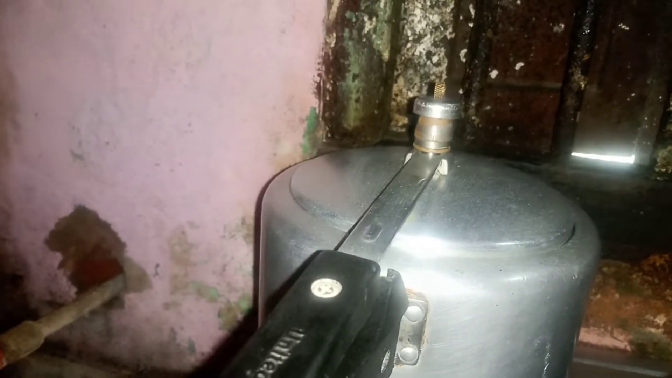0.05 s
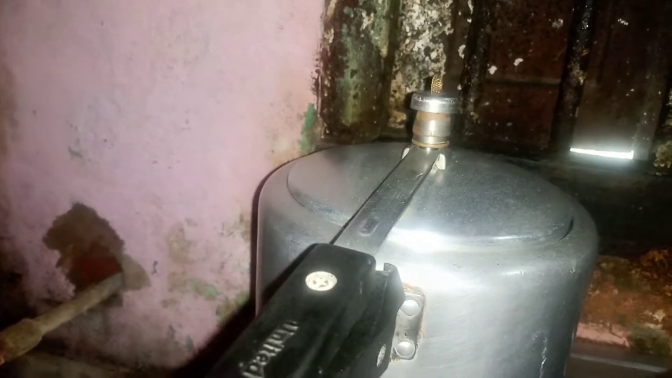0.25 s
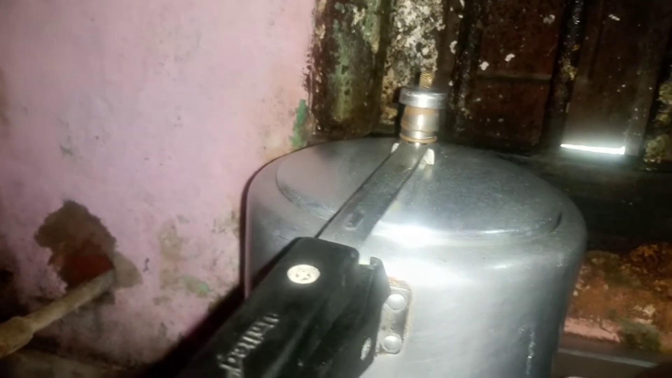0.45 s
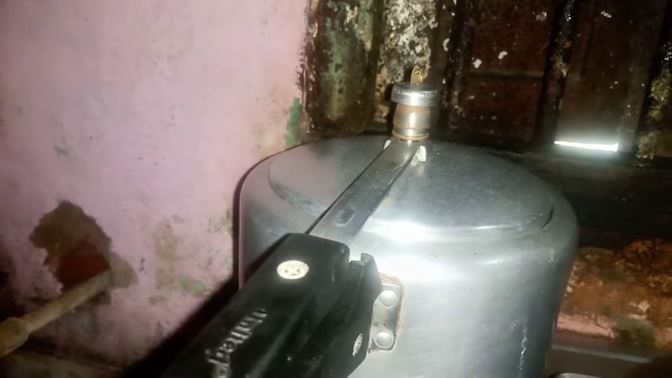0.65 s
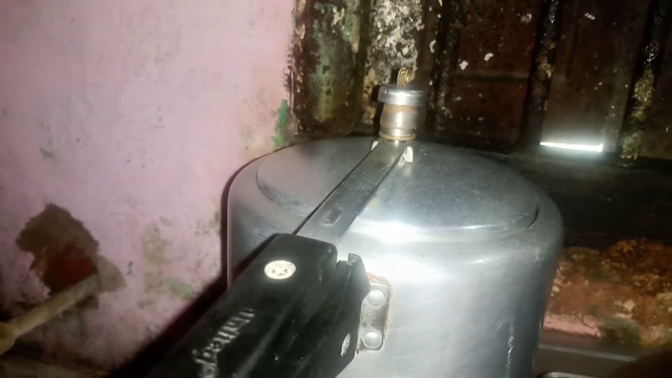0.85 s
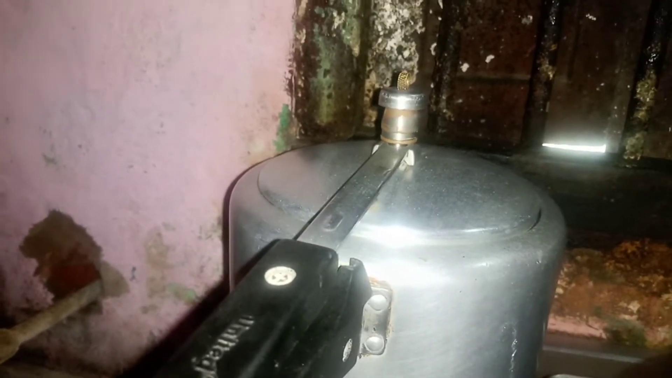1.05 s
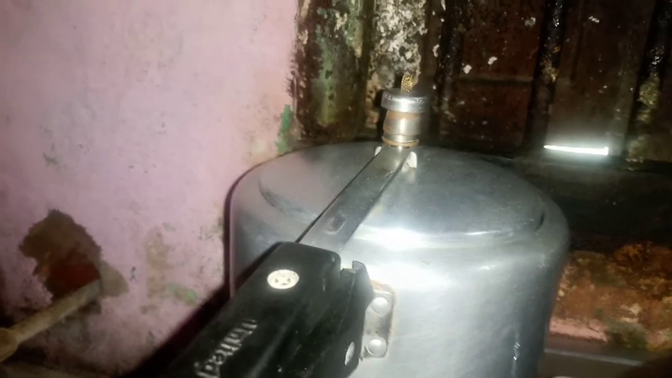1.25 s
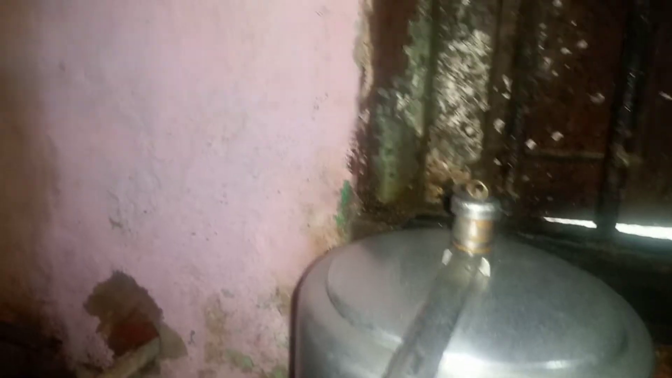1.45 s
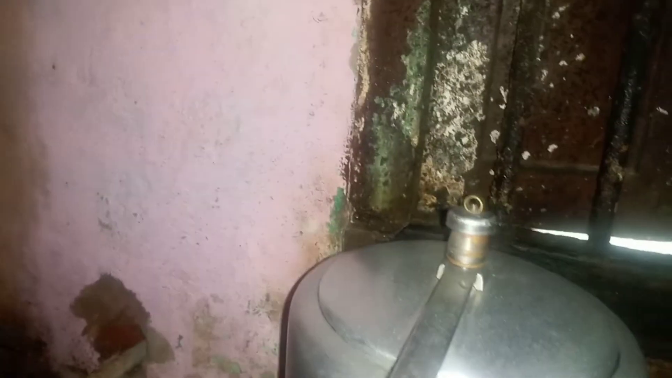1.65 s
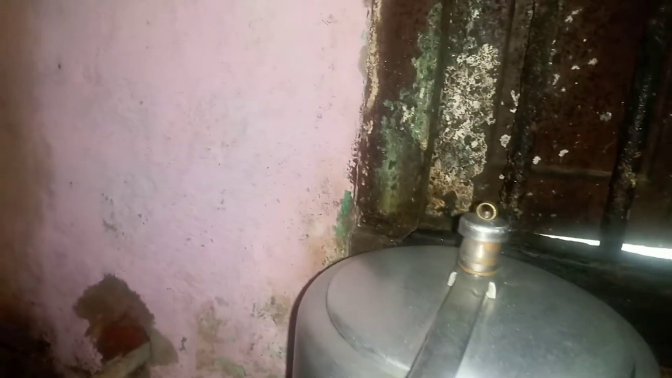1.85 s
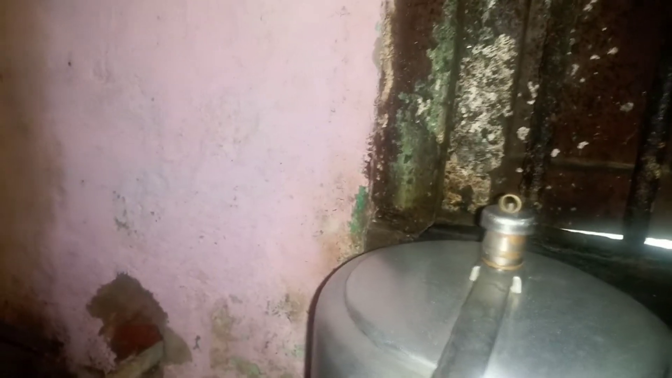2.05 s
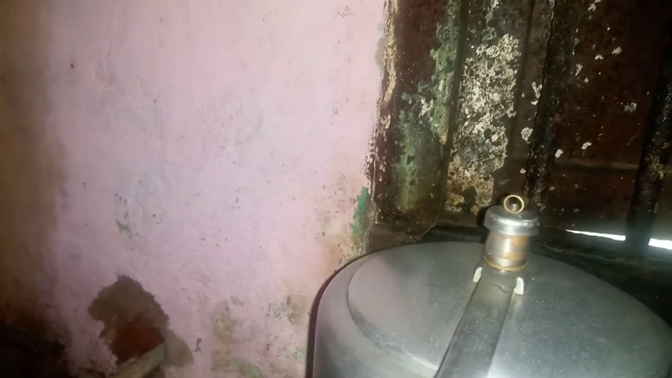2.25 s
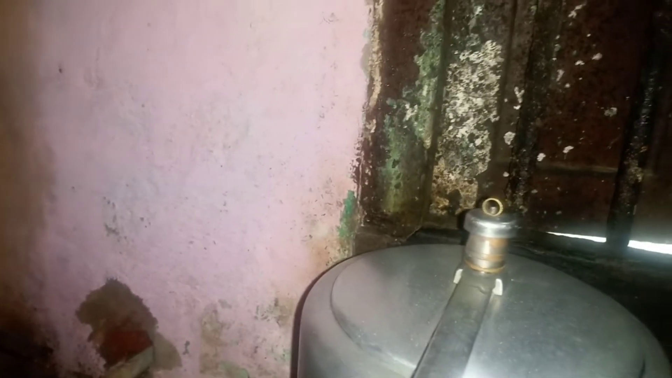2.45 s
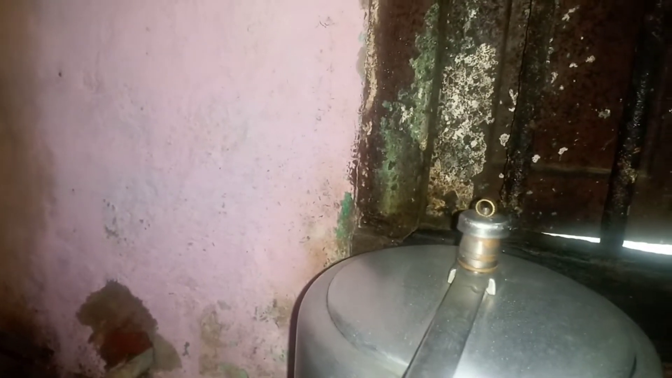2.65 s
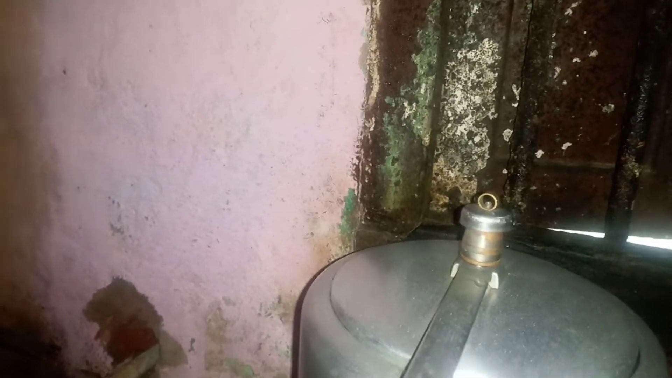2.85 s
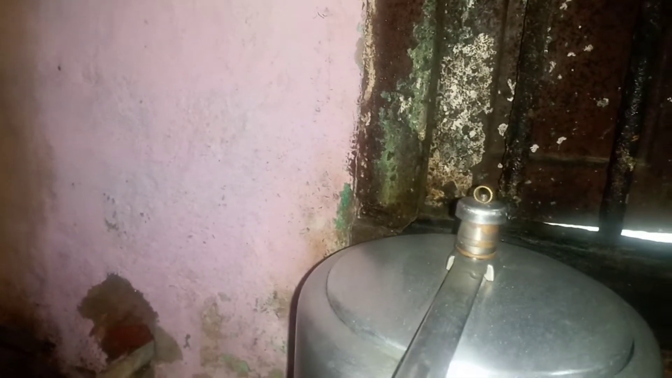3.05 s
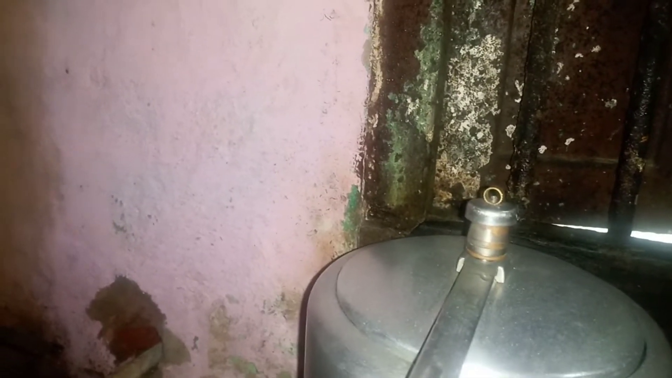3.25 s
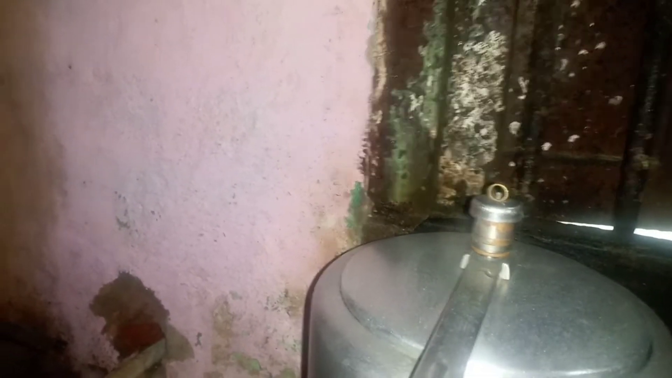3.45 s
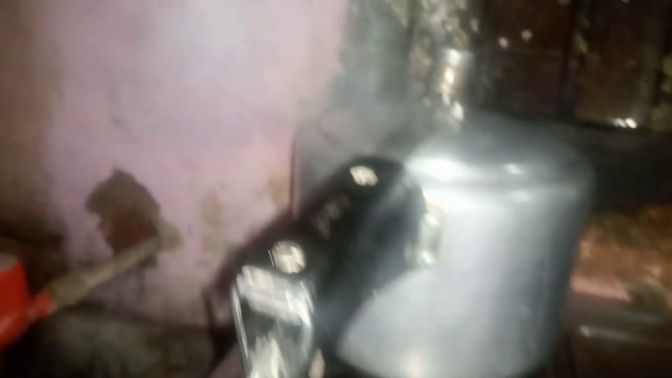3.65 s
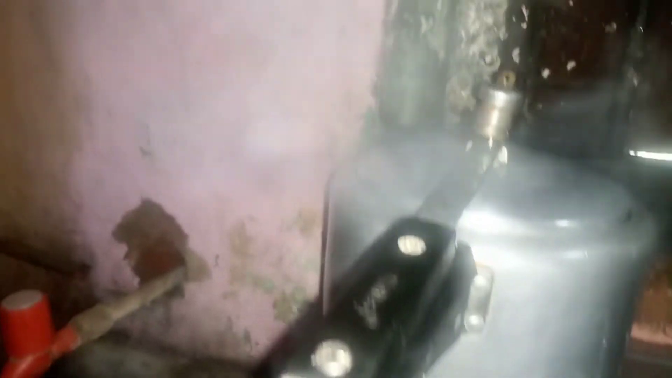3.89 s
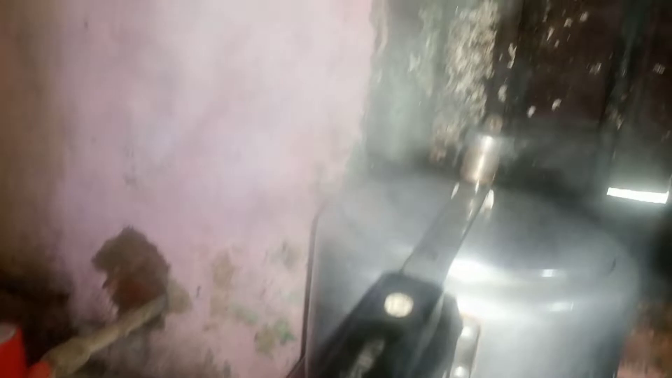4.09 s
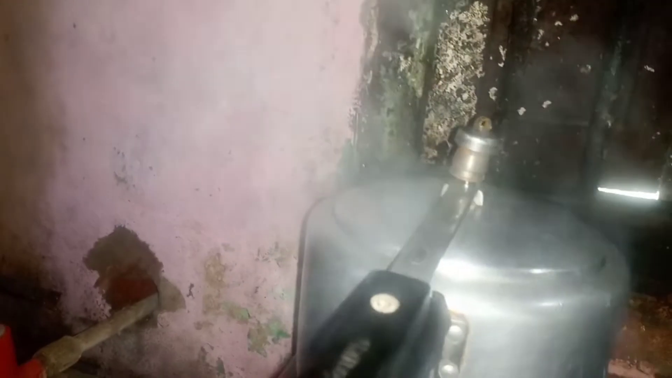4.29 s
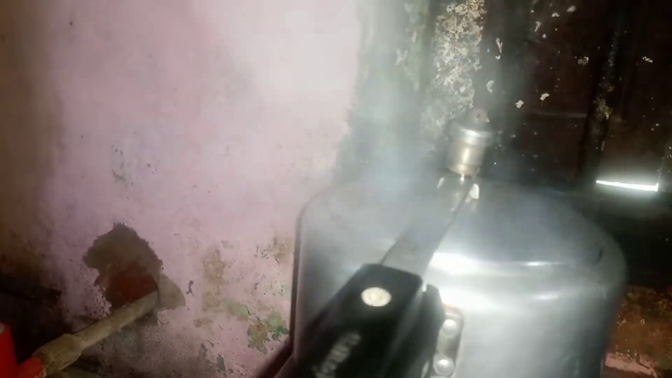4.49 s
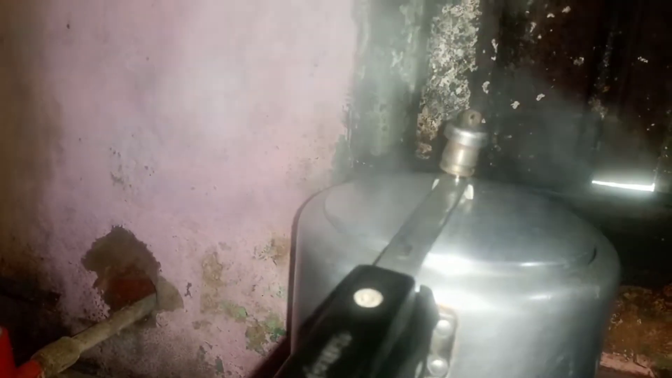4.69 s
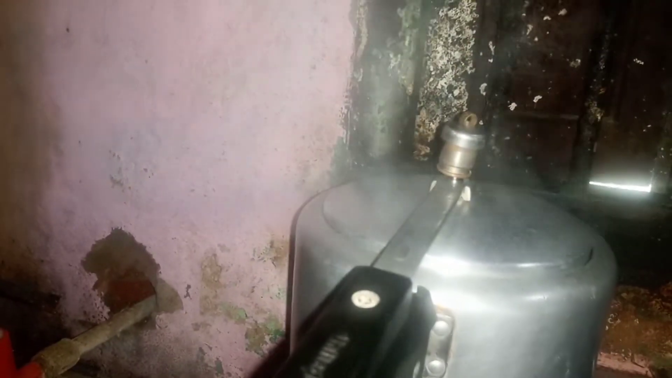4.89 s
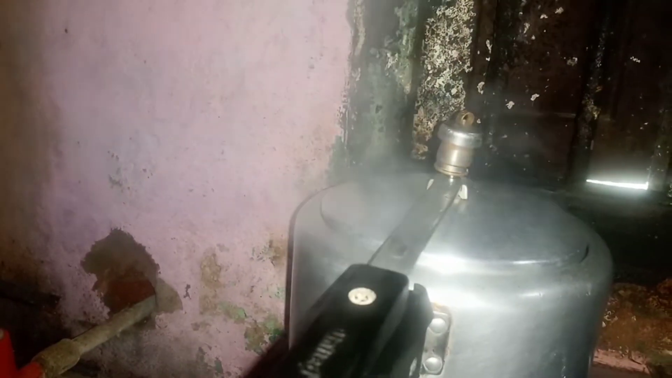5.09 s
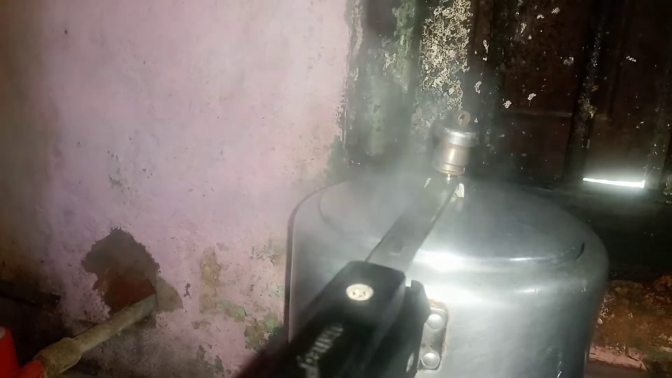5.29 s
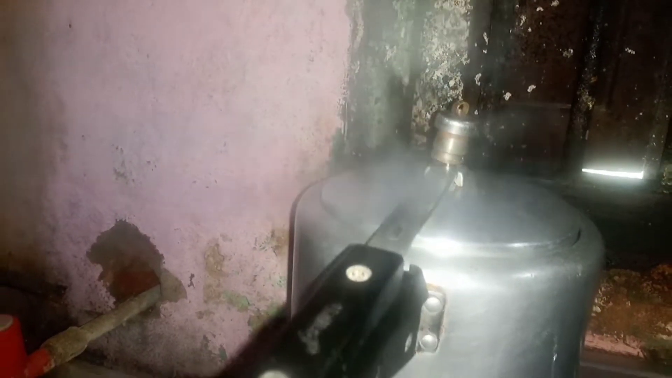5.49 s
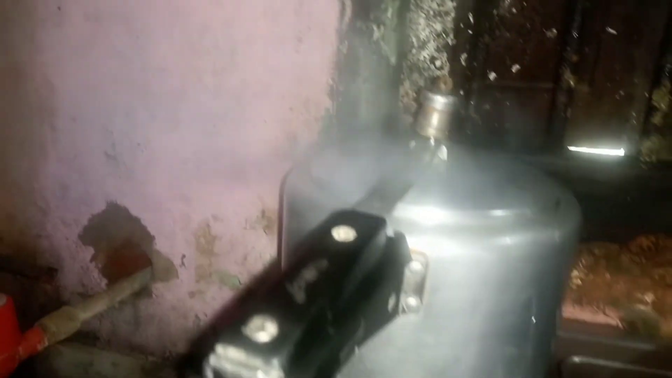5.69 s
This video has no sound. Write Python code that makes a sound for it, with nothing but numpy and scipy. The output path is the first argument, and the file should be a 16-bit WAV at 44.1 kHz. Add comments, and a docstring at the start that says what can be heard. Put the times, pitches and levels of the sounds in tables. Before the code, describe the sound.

A pressure cooker hisses in surges, thins to a seep, then vents a loud jet of steam that buffets the microphone.

```python
"""A small kitchen: a pressure cooker on a rumbling gas burner, heard by one near microphone.
Steam leaks under the weight valve, first in surges, then thinly, its colour sliding as the wet gap
changes. Then the weight lifts: the full jet roars and its eddies buffet the microphone.
Between these three stages the sound stops dead, then fades back in."""
import sys
import numpy as np
from scipy import signal
from scipy.fft import rfft, irfft, next_fast_len
from scipy.io import wavfile
from scipy.ndimage import uniform_filter1d, map_coordinates

SR = 44100
rng = np.random.default_rng(int(sys.argv[2]) if len(sys.argv) > 2 else 0)


def dump_mix(stems):
    """Bounce the given channels to the path in sys.argv[1] as a 16-bit WAV at rate SR."""
    frames = np.atleast_2d(stems).T  # one column per channel
    limited = np.clip(frames, -1, 1)  # hard clip at full scale
    pcm = np.round(limited * 32767).astype(np.int16)
    wavfile.write(sys.argv[1], SR, pcm)


N = 252693
T = np.arange(N) / SR


def amp(db):
    """Decibels to gain."""
    return 10 ** (np.asarray(db) / 20)


def unit(x):
    """Scaled to rms 1."""
    return x / np.sqrt(np.mean(x ** 2) + 1e-20)


def spectrum_gain(points, hz):
    """Gain through (Hz, dB) points on a log axis."""
    point_hz, db = np.transpose(points)
    return amp(np.interp(np.log(hz + 1), np.log(point_hz + 1), db))


def resonance_gain(modes, hz):
    """Gain of (centre Hz, width Hz, dB) resonances, summed in power."""
    return np.sqrt(sum(amp(db) ** 2 / (1 + (2 * (hz - f) / width) ** 2) for f, width, db in modes))


def swells(rows):
    """Gain of bell-shaped (centre s, half length s, dB) swells, summed in power."""
    return np.sqrt(sum(amp(db) ** 2 * np.exp(-2 * ((T - s) / half) ** 2) for s, half, db in rows))


def wobble(rate_hz):
    """Smooth random curve, rate_hz knots a second."""
    return map_coordinates(rng.standard_normal(int(N * rate_hz / SR) + 4), [T * rate_hz])


def filtered(x, response):
    """x through a gain given as a function of Hz."""
    size = next_fast_len(N + SR // 2)
    return irfft(rfft(x, size) * response(np.fft.rfftfreq(size, 1 / SR)), size)[:N]


def noise(response):
    """Coloured noise of rms 1."""
    return unit(filtered(rng.standard_normal(N), response))


# Flame spectrum. Each row: frequency in Hz, relative density in dB.
FLAME_SPECTRUM = [(25, -37), (55, -37), (75, -22), (100, -0.5), (125, -8), (185, -1), (230, -5), (285, -12),
                  (340, -7.5), (430, -17.5), (700, -4.5), (870, -11.5), (1200, -1), (2200, -9), (4000, -36)]
# Hollow under the pot. Each row: centre in Hz, width in Hz, relative level in dB.
HOLLOW_MODES = [(285.6, 29, 0)]
# Flame flares. Each row: centre in seconds, half length in seconds, level in dB.
FLAME_FLARES = [(.39, .12, -54), (3.28, 0.046, -56)]


def burner(boom_db=-64.5):
    """The gas flame rumbles and booms in the hollow under the pot, more so when it flares."""
    flame = amp(-55.5 + 1.8 * wobble(6.58)) * noise(lambda hz: spectrum_gain(FLAME_SPECTRUM, hz))
    boom_gain = np.hypot(amp(boom_db), swells(FLAME_FLARES))
    return flame + boom_gain * noise(lambda hz: resonance_gain(HOLLOW_MODES, hz) ** 2)


def eddies(starts_s, sizes, life_s, scatter):
    """Each eddy pushes or pulls on the microphone port and relaxes; the port band-limits the pulse."""
    t = np.arange(SR // 50) / SR
    draws = rng.standard_normal((len(starts_s), 2))
    lives_s = life_s * np.exp(scatter * draws[:, 1:])
    pulses = sizes[:, None] * np.sign(draws[:, :1]) * np.exp(-t / lives_s)
    samples = (starts_s[:, None] * SR).astype(int) + np.arange(len(t))
    pressure = np.bincount(samples.ravel(), pulses.ravel(), N)[:N]
    port = signal.butter(3, [106, 3950], 'band', fs=SR, output='sos')
    return signal.sosfilt(port, pressure)


LIFT_S = 3.456  # the weight lifts
# Plume turbulence. Each row: frequency in Hz, relative density in dB.
RUMBLE_SPECTRUM = [(25, -31), (45, -24), (70, -1), (110, 1), (200, -1.5), (400, -13), (1000, -22)]
# Gusts at the microphone. Each row: centre in seconds, relative buffet in dB, relative slap in dB.
PLUME_GUSTS = [(3.628, -54, -15), (3.729, -37, -10.5), (3.826, -35, -18), (3.939, -28.5, -16),
               (4.114, -27.5, -10.5), (4.18, -27.5, -20), (4.25, -31, -20), (4.311, -29, -10),
               (4.346, -34, -7.5), (4.444, -34.5, -10), (4.503, -22, -17), (4.68, -30.5, -15),
               (4.811, -25.5, -14), (4.872, -30.5, -12.5), (4.998, -34, -13), (5.103, -32.5, -13.5),
               (5.189, -34, -19), (5.313, -26, -13), (5.479, -42, -17), (5.659, -30, -14.5)]


def plume(eddy_count=2200, base_db=-34, build_s=0.29, gust_half_s=0.03):
    """Small eddies crackle at the microphone over a rumble; each gust swells both and lands a slap."""
    build = np.clip((T - LIFT_S) / build_s, 0, 1)
    gusts = swells([(s, gust_half_s, db) for s, db, _ in PLUME_GUSTS])
    buffet = np.hypot(amp(base_db) * build, gusts)
    starts_s = rng.uniform(0, T[-1], eddy_count)
    sizes = amp(6.5 * np.clip(rng.standard_normal(eddy_count), -2, 1.5))
    crackle = amp(-2) * buffet * unit(eddies(starts_s, sizes, life_s=0.0003, scatter=0.66))
    rumble_gain = buffet ** 0.72 * amp(-11 + 1.9 * wobble(45))  # steadier than the crackle
    rumble = rumble_gain * noise(lambda hz: spectrum_gain(RUMBLE_SPECTRUM, hz))
    gust_s, _, slap_db = np.transpose(PLUME_GUSTS)
    slaps = eddies(gust_s, amp(slap_db), life_s=0.00046, scatter=0.092)
    return crackle + rumble + slaps


def early_echoes(x, echo_db, spread_s=0.022, count=40):
    """Weak echoes off lid and walls ripple the spectrum."""
    lateness = rng.random(count)
    sizes = rng.standard_normal(count) * np.exp(-2 * lateness)
    delays_s = 0.001 + spread_s * lateness
    impulse = np.bincount((SR * delays_s).astype(int), sizes / np.linalg.norm(sizes))
    return unit(x + amp(echo_db) * signal.fftconvolve(x, impulse)[:N])


def jet(spectrum, modes, ring_db, echo_db):
    """Turbulence at the nozzle rings the cavities of valve and lid."""
    def response(hz):
        return np.hypot(spectrum_gain(spectrum, hz), amp(ring_db) * resonance_gain(modes, hz))
    return early_echoes(noise(response), echo_db)


def droplets(shape):
    """Moving droplets shift the colour: a random field, smooth over about 500 Hz and 0.1 s."""
    field = uniform_filter1d(rng.standard_normal(shape), 11, axis=0)
    return unit(uniform_filter1d(field, 8, axis=1))


def wet_gap(steam, edge_hz, wetness, dip_db, dip_octaves, peak_db, null_db, droplet_db):
    """A dip and a narrow null slide below the hiss's edge, a peak just above; wetness scales them."""
    hz, t, spectra = signal.stft(steam, SR, nperseg=1024)
    octaves_above = np.log2((hz[:, None] + 1) / np.interp(t, T, edge_hz))
    dip = dip_db * np.exp(-(2 * octaves_above / dip_octaves + 1) ** 6)
    null = null_db * np.exp(-((octaves_above + 0.75) / 0.12) ** 2)
    peak = peak_db * np.exp(-(octaves_above / 0.22 - 1) ** 2)
    colour_db = np.interp(t, T, wetness) * (peak - dip - null) + droplet_db * droplets(spectra.shape)
    return unit(signal.istft(spectra * amp(colour_db))[1][:N])


OPEN_EDGE_HZ = 3850  # lower edge of the hiss, weight fully lifted
# Fizz in the gap. Each row: frequency in Hz, relative density in dB.
FIZZ_SPECTRUM = [(12500, -39.5), (13900, -11), (14500, -5.5), (15200, 1), (16500, -11.5)]


def flow(steam, flow_db, edge_hz, flutter_db, fizz_db):
    """More flow is louder and fizzier; the trembling weight flutters hiss and fizz alike."""
    narrow_db = 2.5 * np.log2(edge_hz / OPEN_EDGE_HZ)  # narrower gap: higher edge, more fizz
    fizz_gain = amp(fizz_db + narrow_db + 0.4 * flow_db + 1.5 * wobble(28))
    fizz = fizz_gain * noise(lambda hz: spectrum_gain(FIZZ_SPECTRUM, hz))
    tremble = unit(wobble(90) + wobble(260))
    return amp(flow_db + flutter_db * tremble) * (steam + fizz)


# Surging jet. Each row: frequency in Hz, relative density in dB.
SURGE_SPECTRUM = [(290, -71), (500, -27), (730, -21.5), (870, -29), (1300, -18.5), (2300, -12),
                  (3200, -14.5), (4200, -9), (5300, -2), (5800, -4.5), (6500, 2), (7300, -3), (8200, -9),
                  (10900, -14), (11900, -21), (14000, -17.5)]
# Valve and lid resonances. Each row: centre in Hz, width in Hz, relative level in dB.
SURGE_RESONANCES = [(4600, 200, -14), (5400, 210, 0), (6050, 190, -2), (6360, 200, -5.5), (6840, 120, -2.5),
                    (7350, 300, -6), (8900, 300, -8), (10960, 350, -7)]
# Lower edge of the hiss, set by the wet gap. Each row: time in seconds, edge in Hz.
SURGE_EDGE_PATH = [(.48, 2550), (.57, 2850), (.7, 4140), (.9, 4850)]
# Water droplets choke the gap and clear. Each row: time in seconds, depth in dB, closing and opening in
# seconds.
DROPLET_CHOKES = [(.065, 4, .2, 0.035), (.445, 9.5, 0.069, 0.059), (.715, 3.5, 0.077, 0.11),
                  (1.05, 10.5, 0.032, .02)]


def surging_leak(level_db=-23, sag_db_per_s=2.4):
    """Water droplets choke the steadily leaking gap now and then, so the hiss surges; the gap dries when the
    flow is choked."""
    edge_hz = np.interp(T, *np.transpose(SURGE_EDGE_PATH))
    choke_db = sum(depth_db * np.exp(-np.where(T < s, (s - T) / close_s, ((T - s) / open_s) ** 2))
                   for s, depth_db, close_s, open_s in DROPLET_CHOKES)
    steam = jet(SURGE_SPECTRUM, SURGE_RESONANCES, ring_db=-0.5, echo_db=-9.5)
    steam = wet_gap(steam, edge_hz, wetness=amp(-0.4 * choke_db),
                    dip_db=5.5, dip_octaves=0.93, peak_db=0.4, null_db=1, droplet_db=1.44)
    hiss = flow(steam, -choke_db, edge_hz, flutter_db=0.46, fizz_db=-16)
    return amp(level_db - sag_db_per_s * T) * hiss


# Seeping jet. Each row: frequency in Hz, relative density in dB.
SEEP_SPECTRUM = [(290, -62), (500, -18.5), (850, -20.5), (1200, -21.5), (2200, -8), (3300, -8),
                 (4400, -6.5), (5300, -5), (6000, -2), (6700, 4.5), (7800, -2.5), (9000, 0), (10500, -8),
                 (12400, -16), (13700, -9.5), (15500, -14)]
# Valve and lid resonances. Each row: centre in Hz, width in Hz, relative level in dB.
SEEP_RESONANCES = [(5370, 250, -3.5), (5770, 80, -2.5), (6470, 110, 3), (6670, 270, 2), (8600, 200, -4.5),
                   (11430, 300, -8)]
# Lower edge of the hiss. Each row: time in seconds, edge in Hz.
SEEP_EDGE_PATH = [(1.35, 6350), (1.68, 4500), (1.95, 4500), (2.3, 2860), (2.56, 3000), (2.69, 3600),
                  (2.82, 4450)]
# Whistles at the valve seat. Each row: centre in seconds, half length in seconds, level in dB.
SEAT_WHISTLES = [(1.64, .03, -42), (2.0, 0.097, -41.5), (2.33, 0.18, -39), (2.77, 0.083, -37)]


def seeping_leak(level_db=-34.5, loose_s=1.94, reseat_s=2.83, shift_s=0.024, loose_db=1.7):
    """The seated weight leaks a thin hiss with breathy whistles; the hiss grows while it sits loose."""
    edge_hz = np.interp(T, *np.transpose(SEEP_EDGE_PATH))
    loose = np.clip(np.minimum(T - loose_s, reseat_s - T) / shift_s + 0.5, 0, 1)
    wetness = np.interp(T, [2.16, 2.51], [0.52, 1])  # water gathers in the seat
    steam = jet(SEEP_SPECTRUM, SEEP_RESONANCES, ring_db=1.5, echo_db=-7.5)
    steam = wet_gap(steam, edge_hz, wetness,
                    dip_db=5.5, dip_octaves=0.89, peak_db=3, null_db=4, droplet_db=1.54)
    whistle = swells(SEAT_WHISTLES) * noise(lambda hz: resonance_gain([(8740, 680, 0)], hz) ** 2)
    flow_db = loose_db * loose + 0.35 * wobble(18)
    return amp(level_db) * flow(steam, flow_db, edge_hz, flutter_db=0.14, fizz_db=-10) + whistle


# Full jet. Each row: frequency in Hz, relative density in dB.
VENT_SPECTRUM = [(100, -22), (600, -43), (1500, -22), (2800, -10.5), (3500, -7), (4250, -7.5), (5100, -5.5),
                 (6200, -3), (7000, -0.5), (8200, -2.5), (10200, -5.5), (12000, -15), (13800, -22.5),
                 (16000, -19)]
# Valve and lid resonances. Each row: centre in Hz, width in Hz, relative level in dB.
VENT_RESONANCES = [(4230, 160, -4.5), (4350, 80, -5.5), (5530, 80, -2), (5820, 60, 2), (6570, 225, 3.5),
                   (6870, 40, 4), (7100, 70, 5), (7560, 40, -0.5), (7900, 84, -1.5), (8440, 100, -5.5),
                   (8700, 45, -11), (9800, 280, -11)]


def vent(level_db=-19.5, settle_s=0.16, shut_edge_hz=5900):
    """The lifted weight frees a full, even jet; it blows water from the gap as the edge falls."""
    shut = np.exp(-np.maximum(T - LIFT_S, 0) / settle_s)
    edge_hz = OPEN_EDGE_HZ + (shut_edge_hz - OPEN_EDGE_HZ) * shut
    steam = jet(VENT_SPECTRUM, VENT_RESONANCES, ring_db=-1, echo_db=-8)
    steam = wet_gap(steam, edge_hz, wetness=(1 + shut) / 2,
                    dip_db=8, dip_octaves=0.85, peak_db=2.5, null_db=0, droplet_db=0.5)
    return amp(level_db) * flow(steam, 0.2 * wobble(6), edge_hz, flutter_db=0.5, fizz_db=-12)


# Silences between the valve's stages. Each row: stop in seconds, resume in seconds.
SILENCES = [(1.223, 1.294), (3.459, 3.544)]


def scene():
    """Surge, seep and full vent in turn, over the burner."""
    stages = [T < resume_s for _, resume_s in SILENCES]
    steam = np.select(stages, [surging_leak(), seeping_leak()], vent() + plume())
    return np.tile(steam + burner(), (2, 1))


def record(dry):
    """Band-limited mono; the sound stops dead at each silence and fades back in."""
    fade_from_db, fade_s, top_hz = -26, 0.35, 15600
    gain = np.ones(N)
    for stop_s, resume_s in SILENCES:
        fade_in = np.clip(amp(fade_from_db) + (T - resume_s) / fade_s, 0, 1)
        gain *= (T < stop_s) + (T >= resume_s) * fade_in
    return np.tile(filtered(dry[0] * gain, lambda hz: hz < top_hz), (2, 1))


dry = scene()
out = record(dry)
dump_mix(out)
```